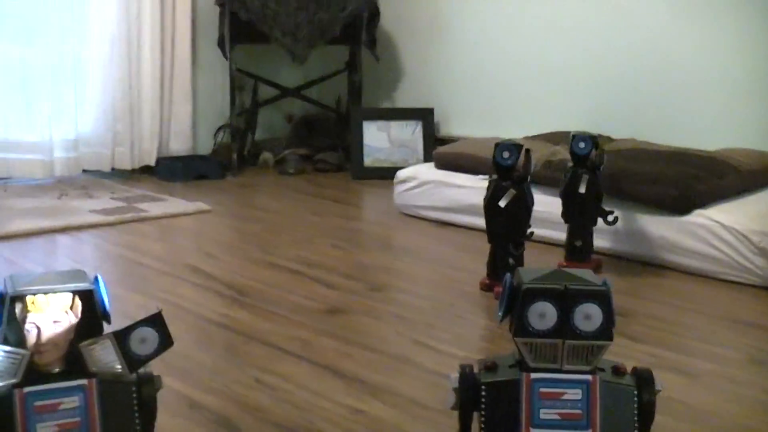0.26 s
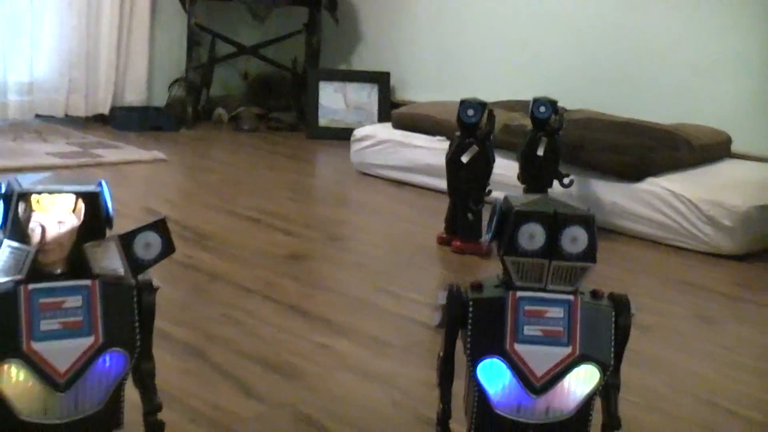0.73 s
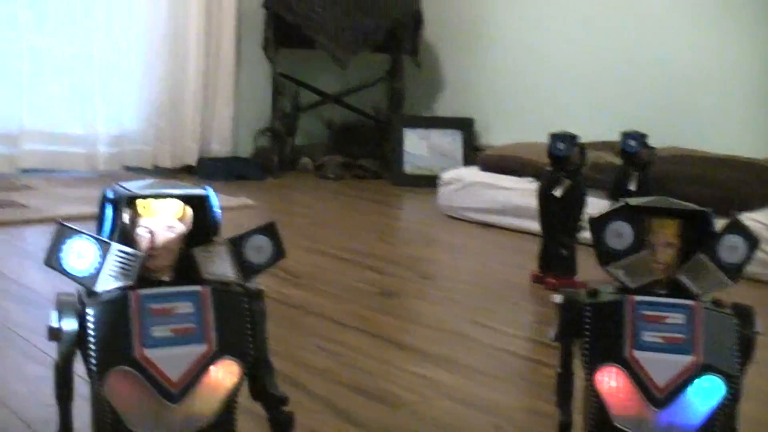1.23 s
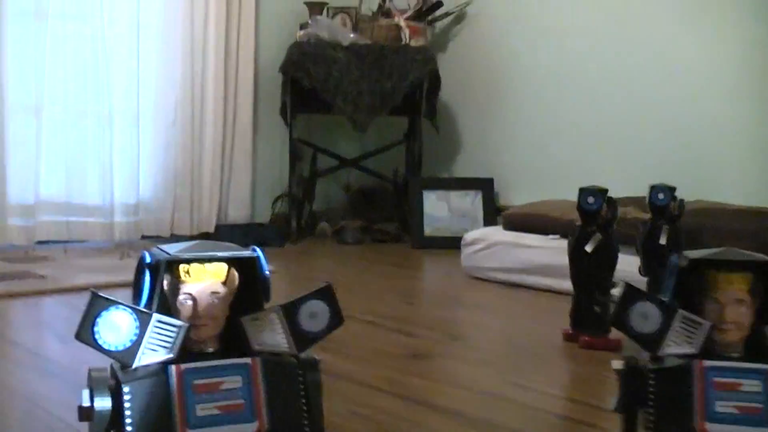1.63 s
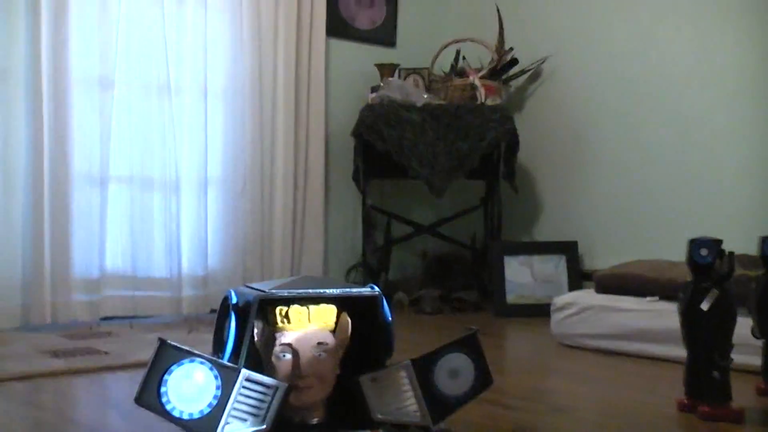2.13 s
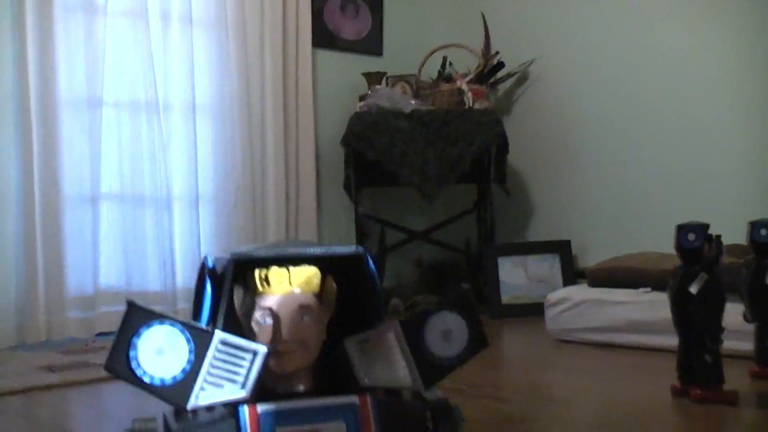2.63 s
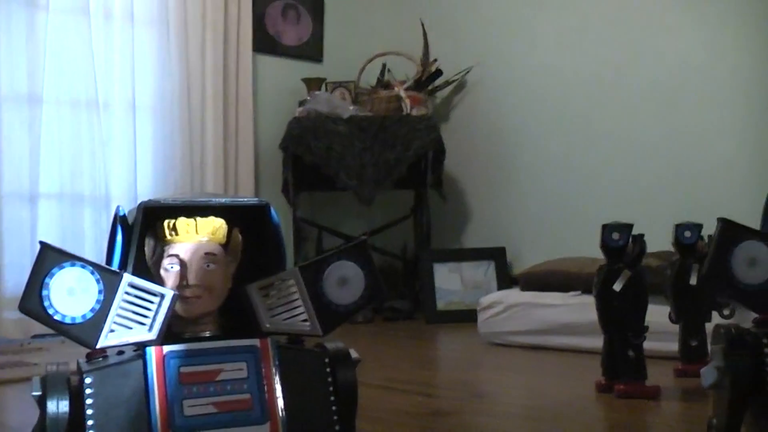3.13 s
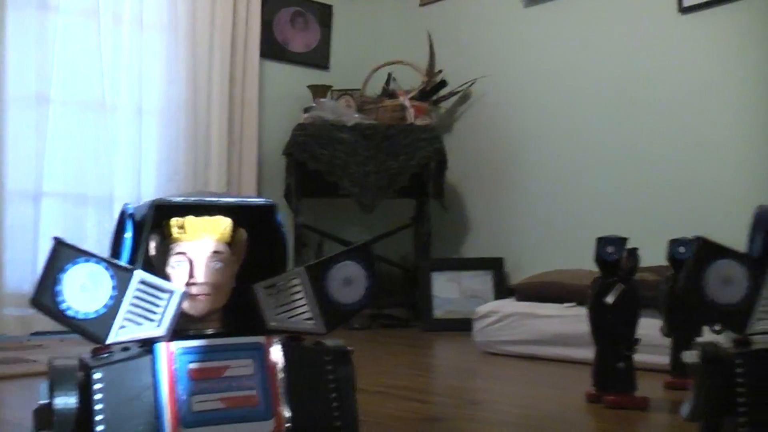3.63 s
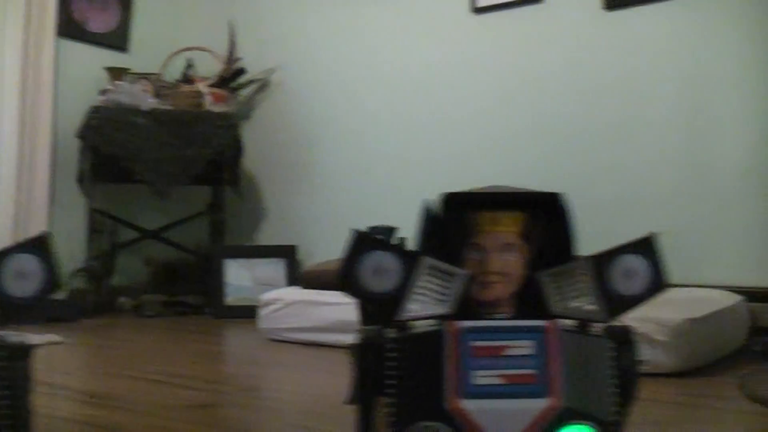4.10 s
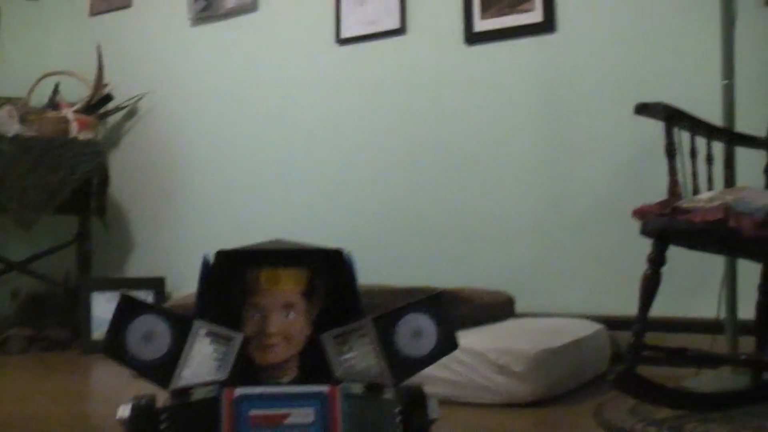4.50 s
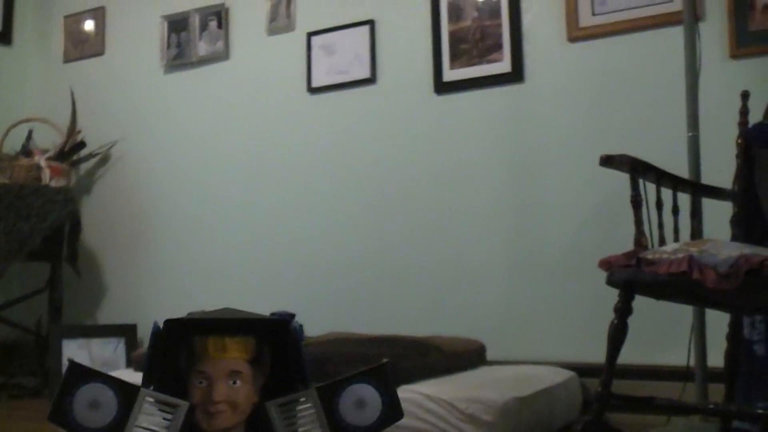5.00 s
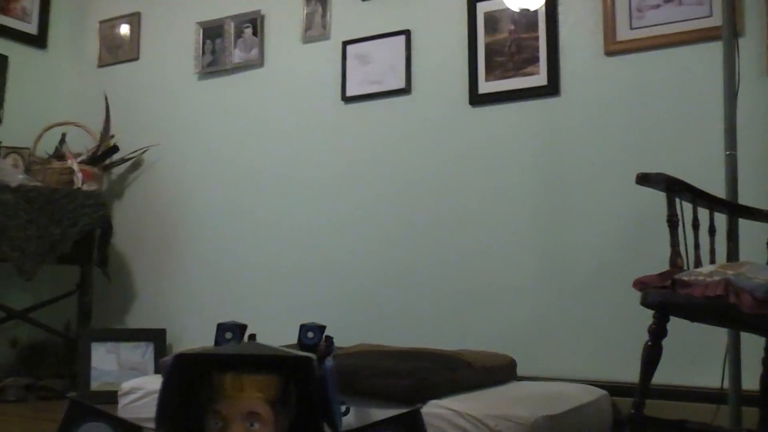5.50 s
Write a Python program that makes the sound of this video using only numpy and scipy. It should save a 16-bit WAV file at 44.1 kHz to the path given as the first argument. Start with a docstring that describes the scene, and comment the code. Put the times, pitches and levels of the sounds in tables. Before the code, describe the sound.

Several battery toy robots walk on a wooden floor close to a hand-held microphone. Their gears click very fast and rattle the hollow bodies in a continuous whir, which dips slightly at first, then grows a little louder and shifts in tone as they turn and pass. Brief gear whines, a few sharp ticks and soft bumps come through, while more robots grind faintly across the living room.

```python
"""Toy robots on a wooden floor.

A living room, with a hand-held microphone close to four shuffling battery toys and more by the far wall.
Loose gear teeth click hundreds of times a second and rattle the hollow bodies, whose resonances swell
and fade as the toys turn and pass. Gear trains sing for a moment and a few sharp ticks stand out.
Underneath, motors hum through the boards, a few soft bumps sound and the room rumbles faintly."""
import sys
import numpy as np
from scipy import signal
from scipy.fft import rfft, irfft, next_fast_len
from scipy.io import wavfile
from scipy.ndimage import uniform_filter1d

SR = 44100
rng = np.random.default_rng(int(sys.argv[2]) if len(sys.argv) > 2 else 0)


def wav_out(sig):
    """Save sig, one row per channel (or a flat mono array), as 16-bit PCM at SR to the path in sys.argv[1]."""
    wavfile.write(sys.argv[1], SR, np.round(np.clip(np.atleast_2d(sig).T, -1, 1) * 32767).astype(np.int16))


N = 253575

# one gearbox per close robot: (tooth rate [Hz], slow wheel [Hz], stride rate [Hz], level [dB],
# left minus right [dB], steady whine relative to the low rattle [dB])
CLOSE_ROBOTS = [(1178.5, 16.3, 2.3, -3, 1, -20), (625.8, 24.3, 2.1, -3, 5, -13.5),
                (533.6, 14, 2.6, -3, 0, -15), (587.4, 12, 1.9, -4, 2, -20)]
# colour of the hollow shells: (frequency [Hz], gain [dB])
SHELL_COLOUR = [(40, -33), (100, -25), (230, -20), (310, -11.5), (420, -1), (660, 0.5), (820, -4.5),
                (1000, -1.5), (1350, 1.5), (2200, 1), (3400, 1), (5600, -0.5), (7200, -5.5), (8400, -7.5),
                (12000, -19.5), (15500, -27)]
# the low rattle follows how near the toys are to the microphone: (time [s], level [dB])
LOW_RATTLE = [(0, -38.5), (.4, -43), (.85, -44.5), (1.0, -37), (1.15, -36.5), (1.29, -37), (1.45, -35.5),
              (1.65, -36), (2.2, -37), (3.05, -34.5), (3.3, -33), (3.95, -34), (4.12, -38), (4.3, -33),
              (4.55, -36), (5.0, -34.5), (5.15, -32), (5.28, -35), (5.42, -33), (5.75, -35.5)]


def rattle():
    """Close up, the gearboxes sound through their shells, in three bands that change as the toys move."""
    # surges as the toys stride, turn and pass: (time [s], middle level [dB], treble level [dB])
    surges = [(0.0, -26, -31.5), (0.05, -26.5, -30), (0.09, -28.5, -33), (0.169, -28.5, -33.5),
              (0.26, -30, -36.5), (0.42, -28.5, -35.5), (0.55, -32.7, -36), (0.72, -31, -35),
              (0.85, -29.5, -35), (0.93, -28, -33.5), (0.99, -26, -31.5), (1.15, -25.5, -31),
              (1.29, -24, -29), (1.42, -24.5, -30.5), (1.58, -25, -31.5), (1.75, -24, -30),
              (1.9, -25, -29.7), (1.98, -27, -32.5), (2.1, -27.3, -31), (2.18, -25, -29.5),
              (2.3, -23.5, -27), (2.44, -24.7, -29.7), (2.51, -23, -28.3), (2.59, -25.5, -31.5),
              (2.66, -23, -30.5), (2.8, -25, -30.9), (3.0, -24.5, -29.5), (3.1, -24, -28.5),
              (3.21, -22.5, -28), (3.45, -23.3, -29.5), (3.6, -22.5, -28.5), (3.84, -24.5, -30),
              (3.93, -26.3, -32.5), (4.085, -27, -32), (4.125, -24, -30), (4.4, -24, -29), (4.65, -25, -29),
              (4.87, -25.5, -29), (4.949, -25, -27.5), (5.05, -22, -28.5), (5.22, -24, -29),
              (5.37, -23, -28.5), (5.47, -23, -27.5), (5.6, -22.8, -27.5), (5.75, -25, -26.5)]
    # where the toys stand before the microphone: (time [s], left minus right [dB])
    bearing = [(0.0, -0.5), (0.78, -0.5), (1.25, -2.5), (3.25, -3), (4.74, -0.5), (5.75, -1.5)]
    bands_hz = [(40, 900), (900, 5500), (5500, 19000)]
    gears = sum(gearbox(tooth_hz, wheel_hz, stride_hz) * undb(db) * pan(side_db)
                for tooth_hz, wheel_hz, stride_hz, db, side_db, _ in CLOSE_ROBOTS)
    shells = colour(room(gears), SHELL_COLOUR)
    levels_db = curves(LOW_RATTLE) + curves(surges)
    bands = sum(body_resonances(shells, edges) * undb(db) for edges, db in zip(bands_hz, levels_db))
    return bands * pan(curves(bearing)[0])


def gearbox(tooth_hz, wheel_hz, stride_hz, backlash=0.18, rebound=0.3, scatter_db=3):
    """Gear teeth strike one after another, each a little early or late; loose parts chatter along."""
    t = np.arange(N) / SR
    load = np.sin(2 * np.pi * (stride_hz * t + rng.random()))
    speed = 1 - 0.015 * load + 0.018 * walk(14)  # the motor slows as a leg pushes
    motor_s = np.cumsum(speed) / SR
    wobble = np.sin(2 * np.pi * (wheel_hz * motor_s + rng.random()))
    force = undb(0.03 * load + 1.23 * wobble)  # an off-centre wheel presses harder once a turn
    late, size = rng.standard_normal((N // 20, 2)).T
    flank = np.where(rng.random(len(late)) < rebound, -1, 1)  # some teeth rebound onto their back flank
    strength = flank * undb(scatter_db * size)
    strike_s = (np.arange(len(late)) + backlash * late) / tooth_hz
    at = np.interp(strike_s, motor_s, np.arange(N), left=-1, right=-1)
    teeth = np.bincount(at[at >= 0].astype(int), strength[at >= 0], N)
    chatter = unit(rng.standard_normal(N) * (rng.random(N) < 6000 / SR))  # about 6000 ticks a second
    clicks = disperse(force * (unit(teeth - teeth.mean()) + undb(-1) * chatter))
    return unit(clicks + undb(-5) * shifting_ring(clicks, t60=0.049))


def disperse(x, spread=0.58, stages=6):
    """Bending waves cross a panel faster in the treble, which smears each click."""
    return signal.sosfilt([[-spread, 1, 0, 1, -spread, 0]] * stages, x)


def body_resonances(sound, edges_hz):
    """One band of the rattle at rms near 1; beamed resonances draw a changing share of its energy."""
    # always heard, the air cavity first and then the panels: (frequency [Hz], width [Hz], lift [dB])
    body_modes = [(573, 260, 1.2), (1137, 350, 2.5), (2750, 220, 1.1), (3910, 550, 1.8), (4510, 650, 1.4)]
    # a body turns toward the microphone and away again, so one resonance swells:
    # (middle [s], length [s], frequency [Hz], width [Hz], lift [dB])
    turns = [(.03, 0.51, 6500, 2000, 6.5), (0.097, 0.48, 1900, 600, 2.5), (.62, 0.59, 2050, 500, 3),
             (.8, 0.91, 1180, 240, 3.5), (1.15, 0.4, 4300, 1400, 2), (1.35, .4, 3850, 500, 3),
             (1.51, 0.69, 2820, 720, 4), (1.7, .4, 1450, 600, 2), (1.78, .3, 8380, 604, 4),
             (1.903, 1.5, 600, 210, 2), (2.3, 0.24, 7000, 1800, 3), (2.47, .72, 1195, 340, 3),
             (2.8, 0.47, 4400, 1000, 3), (2.846, .4, 5300, 280, 7), (3.21, .56, 3860, 560, 3.5),
             (3.208, 0.25, 2150, 600, 3.5), (3.45, 0.8, 2700, 750, 3.5), (3.55, 0.41, 1220, 480, 5),
             (3.73, 0.5, 8400, 700, 4.5), (3.7, 1.47, 600, 190, 4.8), (4.24, 0.72, 1207, 340, 5.5),
             (4.27, 0.42, 3900, 500, 3.8), (4.26, 0.32, 2770, 500, 3.5), (4.719, .34, 1330, 398, 4.5),
             (4.876, 0.25, 4620, 600, 6.5), (5.06, 0.37, 4030, 450, 6.5), (5.25, 1.1, 4570, 520, 4.5),
             (5.357, .16, 4000, 450, 7), (5.36, 0.84, 2760, 680, 4.5), (5.46, 0.21, 1280, 400, 4),
             (5.4, 1.1, 593, 190, 4.5)]
    bandpass = signal.butter(4, edges_hz, "band", fs=SR, output="sos")
    padded = np.pad(sound, ((0, 0), (0, SR // 10)))
    band = unit(signal.sosfiltfilt(bandpass, padded, padtype=None)[:, :N])
    beamed_modes = [(hz, width, db * swell(middle, length)) for middle, length, hz, width, db in turns]
    out, power = band, 1
    for hz, width, db in body_modes + beamed_modes:
        if edges_hz[0] < hz < edges_hz[1]:
            peak = np.concatenate(signal.iirpeak(hz, hz / width, fs=SR))
            mode = signal.sosfilt([peak, peak], band)
            gain = undb(db) - 1
            out = out + gain * mode
            power = power + gain ** 2 * np.mean(mode ** 2)
    return out / np.sqrt(power)


def gear_whine():
    """Each tooth rate sounds as a faint tone; a gear train sings out while it runs smoothly."""
    # moments of smooth running: (middle [s], length [s], pitch [Hz], rms level [dB])
    smooth_runs = [(.45, 0.49, 445, -51), (.6, 0.86, 1189, -45.5), (1.32, 0.13, 635, -37.5),
                   (1.623, 0.35, 636, -40.5), (2.12, 0.43, 611, -42), (2.15, 0.44, 445, -47.5),
                   (2.318, .24, 534, -38.5), (2.607, .5, 599, -42.5), (2.8, .5, 738, -48),
                   (2.9, 0.63, 448, -46), (3.244, 0.12, 614, -31), (3.416, 0.21, 631.5, -34),
                   (3.4, 0.68, 534, -41), (3.618, 0.28, 631, -37), (3.88, 0.27, 627, -34.5),
                   (3.954, 0.26, 532, -33), (4.02, 0.28, 452, -48), (4.35, 0.25, 690, -43),
                   (4.583, 0.27, 654, -39.5), (4.75, 0.31, 714, -41), (4.802, 0.62, 414, -47),
                   (5.164, 0.1, 621, -28.5), (5.59, 0.29, 512, -34.5), (5.602, .22, 625, -34)]
    steady = sum(tone(hz, wander=0.0079, flutter_db=0.5) * undb(db) for hz, *_, db in CLOSE_ROBOTS)
    singing = sum(tone(hz, wander=0.00392, flutter_db=0.5) * undb(db) * swell(middle, length)
                  for middle, length, hz, db in smooth_runs)
    return steady * undb(curves(LOW_RATTLE)[0]) + singing


def sharp_ticks():
    """Brief sharp ticks stand out of the rattle: noise bursts coloured by the shells and the room."""
    # single ticks: (time [s], peak before the room [dB], t60 [s])
    ticks = [(0.184, -16, .035), (1.517, -12, .02), (2.827, -16, .001), (3.782, -13, .02),
             (3.821, -11, 0.026), (5.378, -9, .025)]
    out, t = np.zeros(N), np.arange(SR // 10) / SR
    for s, db, t60 in ticks:
        burst = rng.standard_normal(len(t)) * decay(t, t60)
        tick = colour(burst, SHELL_COLOUR)[:len(t)]
        add_hit(out, tick, s, db)
    return room(out * pan(0))


def far_robots(level_db=-40.5):
    """The robots by the far wall grind on evenly and reach the microphone mostly through the room."""
    # their hollow colour at a distance: (frequency [Hz], gain [dB])
    far_colour = [(60, -58), (200, -10), (350, -31), (440, 1.5), (520, 4.5), (750, -15), (1200, -46),
                  (1500, -40), (1900, 0), (2800, -15), (9000, -38), (15500, -45)]
    gears = gearbox(tooth_hz=455, wheel_hz=20, stride_hz=2.2) * pan(0)
    return undb(level_db) * unit(colour(room(gears, wet_db=7.5), far_colour))


def floor_bumps(push_s=0.0017):
    """Each bump pushes softly on the boards and rings their low modes."""
    # soft bumps below the microphone: (time [s], peak [dB], pitch [Hz], t60 [s])
    bumps = [(0.953, -29.5, 275, 0.11), (0.982, -43, 178, .16), (1.494, -41, 157, 0.082),
             (3.415, -38.5, 290, .15), (3.61, -50, 70, .25), (3.87, -53, 58, .25), (5.375, -39, 161, 0.3),
             (5.512, -43, 290, .088)]
    # board modes clustered round each pitch: (frequency [multiple of the pitch], weight [ratio])
    board_modes = [(.78, 0.25), (1, 0.42), (1.21, 0.22)]
    out, t = np.zeros(N), np.arange(SR // 3) / SR
    for s, db, hz, t60 in bumps:
        ring = sum(weight * np.sin(2 * np.pi * (k * hz * t + rng.random())) for k, weight in board_modes)
        thud = ring * (1 - np.exp(-t / push_s)) * decay(t, t60)
        add_hit(out, thud, s, db)
    return out


def motor_hum():
    """Unbalanced rotors drone faintly through the floor."""
    # tones in the boards: (pitch [Hz], rms level [dB], wander [share of the pitch])
    drones = [(121.5, -63, 0.0072), (149, -59.5, 0.029)]
    return sum(undb(db) * tone(hz, wander, flutter_db=4) for hz, db, wander in drones)


def room_tone(level_db=-58.5):
    """Low rumble of the room, loosely alike at the two microphones."""
    # colour of the still air: (frequency [Hz], gain [dB])
    air_colour = [(25, 0), (50, 0), (80, 4), (170, 12), (400, 3.5), (2000, -29.5)]
    noise = rng.standard_normal((2, N)) + 0.6 * rng.standard_normal(N)
    return undb(level_db) * unit(colour(noise, air_colour))


def room(x, t60=0.43, wet_db=-8, width_db=1):
    """Bare floor and walls answer; the bass reaches both microphones alike."""
    # part of the reverberation that differs between the microphones: (frequency [Hz], gain [dB])
    side_colour = [(120, -17), (300, -26), (550, -9.5), (1100, -2.5), (4000, -2.5), (8000, 0), (13000, 1)]
    mono = x.mean(axis=0)
    mid = shifting_ring(mono, t60)
    side = colour(shifting_ring(mono, t60), side_colour)
    return x + undb(wet_db) * (mid + undb(width_db) * np.outer([1, -1], side))


def shifting_ring(x, t60, rate_hz=9, count=3):
    """Dense ringing whose fine pattern keeps changing as the toys and the microphone move."""
    knots_s = np.arange(0, N / SR + 1, 1 / rate_hz)
    blends = rng.standard_normal((N // 100, count))[:len(knots_s)]
    weights = np.array(curves(np.column_stack([knots_s, blends])))
    rings = np.array([signal.oaconvolve(x, tail(t60))[:N] for _ in range(count)])
    return np.sum(weights * rings, axis=0) / np.linalg.norm(weights, axis=0)


def tail(t60):
    """Dying noise of unit energy, t60 s long."""
    t = np.arange(int(t60 * SR)) / SR
    ring = rng.standard_normal(SR)[:len(t)] * decay(t, t60)
    return ring / np.linalg.norm(ring)


def decay(t, t60):
    """A fall of 60 dB every t60 s."""
    return np.exp(-np.log(1000) * t / t60)


def add_hit(out, hit, s, peak_db):
    """Mix in a short sound at time s and the given peak."""
    start = int(s * SR)
    out[start:start + len(hit)] += (undb(peak_db) * hit / np.abs(hit).max())[:N - start]


def tone(hz, wander, flutter_db):
    """An unsteady sine of rms 1."""
    phase = 2 * np.pi * np.cumsum(hz * (1 + wander * walk(30))) / SR
    return unit(np.sin(phase) * undb(flutter_db * walk(24.08)))


def swell(middle, length, fade_s=0.11):
    """A rounded rise from 0 to 1, a hold and a fall."""
    inside_s = length / 2 - np.abs(np.arange(N) / SR - middle)
    return np.sin(np.pi / 2 * np.clip(inside_s / min(fade_s, length / 2), 0, 1))


def walk(rate_hz):
    """Random levels held 1 / rate_hz s and smoothed twice; spread near 1."""
    hold = int(SR / rate_hz)
    steps = np.repeat(rng.standard_normal(N // hold + 1), hold)
    return 1.3 * uniform_filter1d(uniform_filter1d(steps, hold), hold)[:N]


def colour(x, points):
    """Filter by a spectrum of (frequency [Hz], gain [dB]) points."""
    hz, db = np.transpose(points)
    size = 2 * next_fast_len(N // 2 + SR // 10, real=True)
    bins_hz = np.maximum(np.fft.rfftfreq(size, 1 / SR), 1)
    gain = undb(np.interp(np.log(bins_hz), np.log(hz), db))
    return irfft(rfft(x, size) * gain)[..., :N]


def curves(table):
    """The columns of a timed table at every sample."""
    s, *columns = np.transpose(table)
    return [np.interp(np.arange(N) / SR, s, c) for c in columns]


def pan(db):
    """Left and right gains for a level difference."""
    return undb(np.array([np.atleast_1d(db), -np.atleast_1d(db)]) / 2)


def undb(db):
    """Decibels to gain."""
    return 10 ** (np.asarray(db) / 20)


def unit(x):
    """Scale to rms 1."""
    return x / np.sqrt(np.mean(x ** 2))


def scene():
    """Close and distant robots over the low sounds of floor and room."""
    close = rattle() + gear_whine() + sharp_ticks()
    return close + far_robots() + floor_bumps() + motor_hum() + room_tone()


def record(dry, drive=1.3, top_hz=15750):
    """The hand-held camera rounds the highest peaks and cuts the top."""
    rounded = np.tanh(drive * dry) / drive
    return signal.sosfilt(signal.ellip(10, 0.2, 80, top_hz, fs=SR, output="sos"), rounded)


dry = scene()
out = record(dry)
wav_out(out)
```